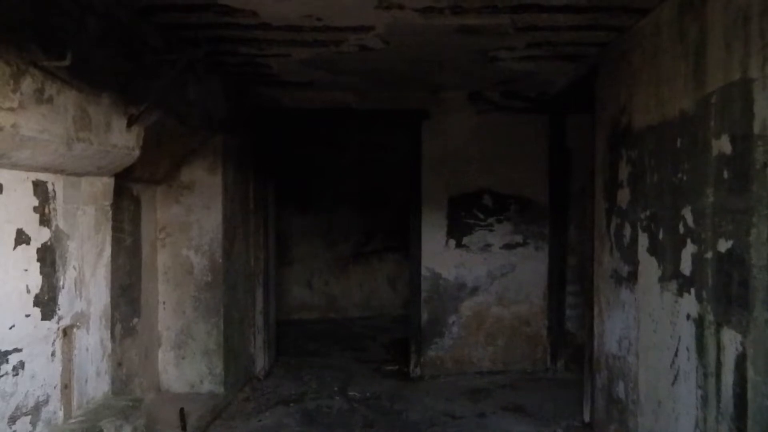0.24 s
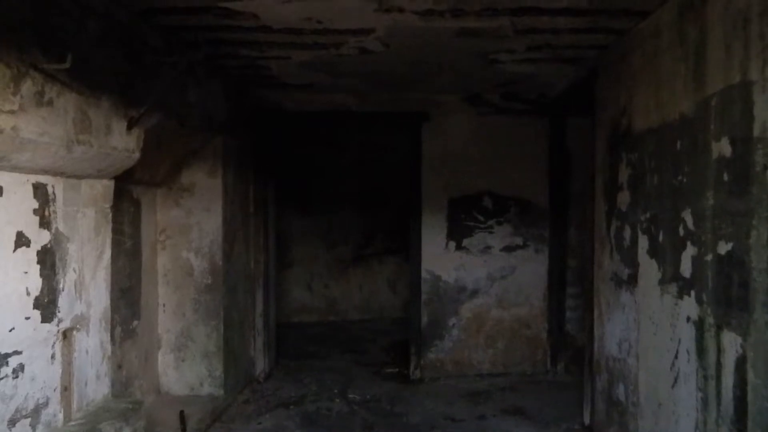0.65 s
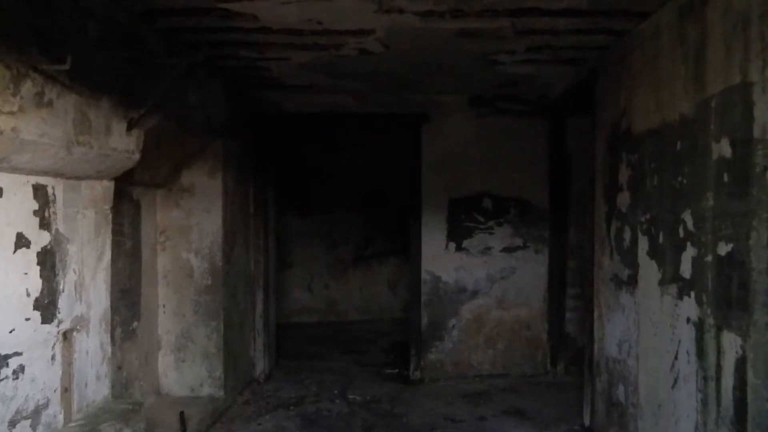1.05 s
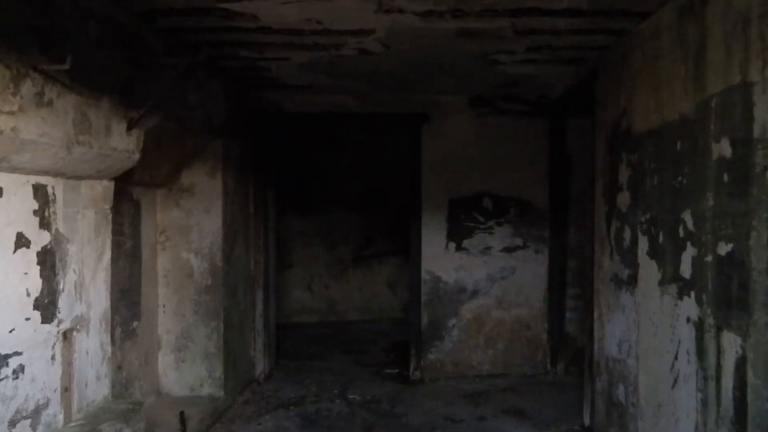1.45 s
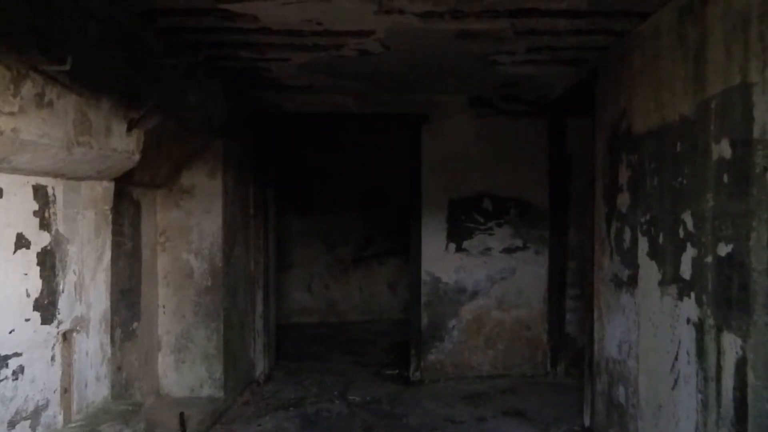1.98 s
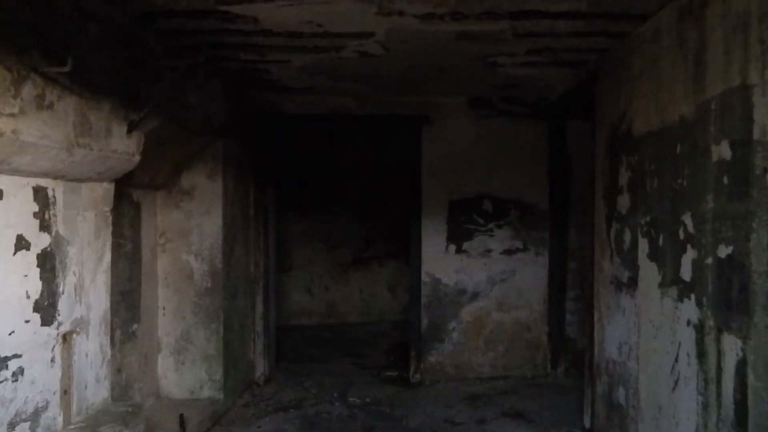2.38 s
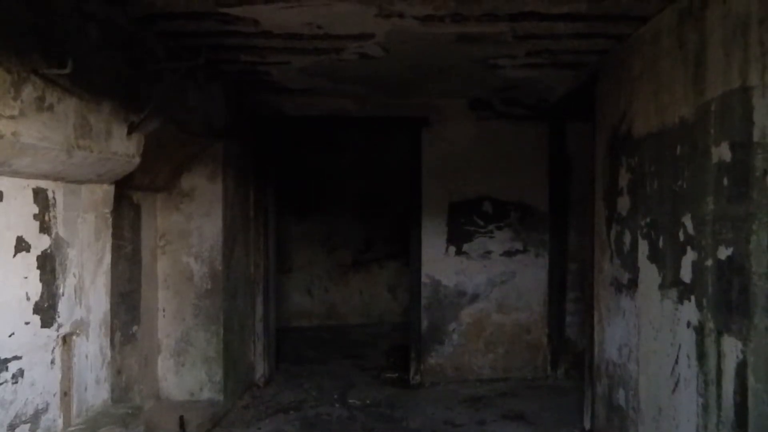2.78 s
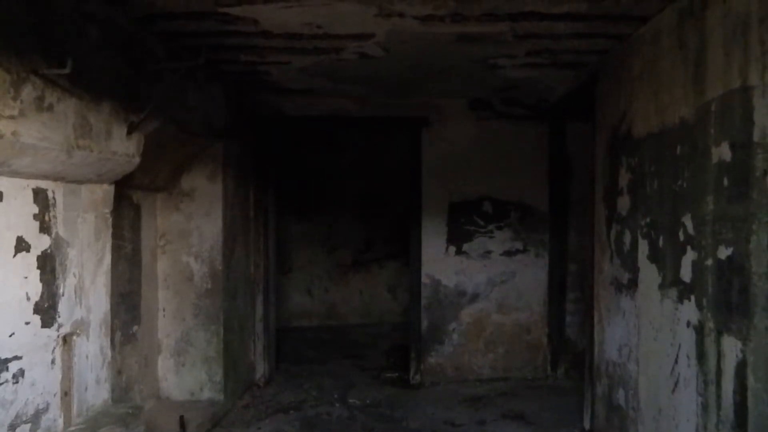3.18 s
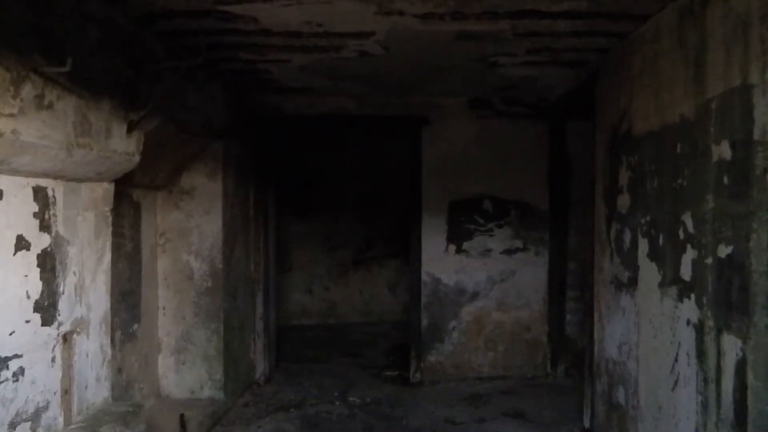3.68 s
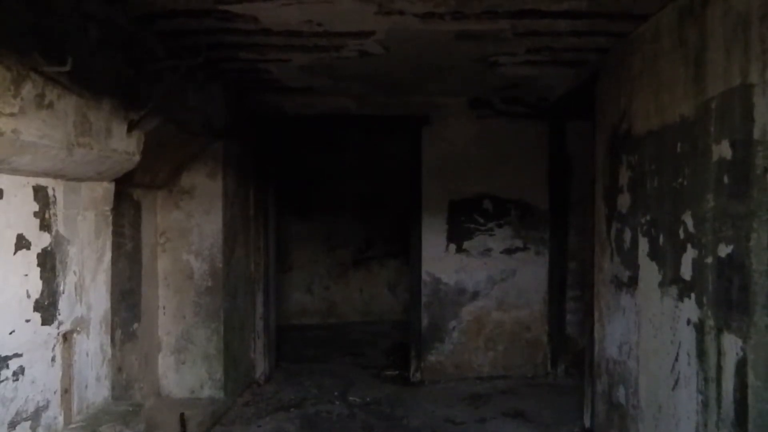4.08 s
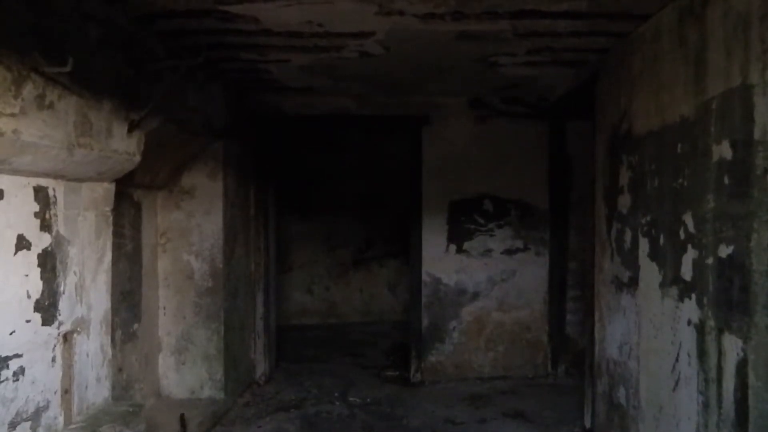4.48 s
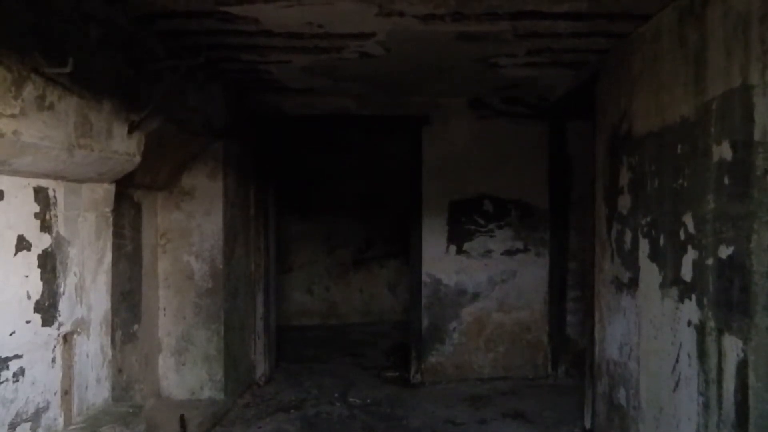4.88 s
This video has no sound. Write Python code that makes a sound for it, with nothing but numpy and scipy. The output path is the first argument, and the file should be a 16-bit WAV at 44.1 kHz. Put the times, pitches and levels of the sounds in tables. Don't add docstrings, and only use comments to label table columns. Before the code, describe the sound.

Unseen swallows chatter in a bare, decaying concrete room. The tail of an earlier call rings at the start, with a faint rasp near 0.15 s. From 0.55 to 0.8 s quick scratchy chirps cluster, then a clear, bright pair arrives at about 0.95 and 1.05 s, the second lower. A string of hoarse, quieter chirps runs from 1.1 to 1.8 s. A higher, strained pair follows at 2.0 to 2.1 s, and a loud pair mixed with raspy begging notes at 2.4 to 2.6 s. Calls thin out around 2.9, 3.2 and 3.5 s, including deeper rough notes. Chirps gather again at 3.9 to 4.25 s, and strong harsh ones come at 4.6 to 5.0 s. Each call dips, then swoops up, leaving a ringing wall echo of about half a second. Underneath, a distant machine hums low and slightly wavering, with soft rumble and faint hiss.

```python
import sys
import numpy as np
from scipy import signal
from scipy.fft import rfft, irfft
from scipy.io import wavfile
from scipy.ndimage import uniform_filter1d

SR = 44100
rng = np.random.default_rng(int(sys.argv[2]) if len(sys.argv) > 2 else 0)


def level_to_linear(level):
    exponent = np.asarray(level, float) / 20
    return 10 ** exponent


def dump(signal):
    limited = np.clip(np.atleast_2d(signal).T, -1, 1)
    pcm = np.round(limited * 32767).astype(np.int16)
    wavfile.write(sys.argv[1], SR, pcm)


N = 226612
FRAME = 6144
TOP_HZ = 15780

PARTIALS = [(1, 0), (0, 1), (1, -1), (-1, 2), (2, -1), (3, -2), (1, 1), (0, 2), (2, 0), (3, -1), (1, 2),
            (2, 1), (3, 0)]


def low_bird():
    notes_sung = [(.605, 4594, -22, -7.5), (1.692, 4587, -22, -4.2), (1.77, 4235, -24.5, 0.3),
                  (2.838, 4670, -18.5, -4.4), (3.534, 4605, -19.5, -4), (4.173, 4923, -15, -2.5),
                  (4.256, 4390, -18, -5.5), (4.68, 4413, -20.5, -4), (4.959, 4780, -16, -2.5)]
    return bird(sung(notes_sung, dip=.795, gap=.333), length_s=.045, echo_db=-3,
                wait=0.4273, locked=1, lead=0.59, throat_size=0.9555, side_db=-6.5, sum_db=5.5,
                rough=0.56, onset_rough=0.17, dip_db=-4.5, lower_db=0.8)


def deep_notes():
    notes_sung = [
        (2.182, 3370, -38, -4),
        (2.91, 3753, -25.5, 7.5),
        (3.898, 3453, -31.5, 9),
        (5.062, 3623, -26, 8.5),
    ]
    return bird(sung(notes_sung, dip=.878, gap=.334), length_s=.048, echo_db=-3,
                wait=.4, locked=.99, lead=0.2, throat_size=1.266, side_db=0.73, sum_db=6.5,
                rough=0.76, onset_rough=-0.5, dip_db=-9, lower_db=5)


def high_bird():
    chirps = [
        (.957, 5636, -18.5, 4246, 1436),
        (1.048, 5085, -16.5, 4037, 1360),
        (2.02, 6450, -23.5, 4767, 1695),
        (2.122, 5907, -19.5, 4442, 1697),
        (2.482, 5740, -16.5, 4384, 1651),
        (2.575, 5167, -14.5, 4250, 1553),
    ]
    calls = []
    for end_s, top_hz, level_db, dip_hz, gap_hz in chirps:
        strain_khz = max(top_hz - 5800, 0) / 1000
        tilt_db = 1.24 + 10 * strain_khz
        calls.append((end_s, dip_hz, top_hz, gap_hz, level_db, tilt_db))
    return bird(calls, length_s=.066, echo_db=-3, stretch=0.97,
                wait=.52, locked=0.18, lead=0.15, throat_size=1.0222, side_db=-2, sum_db=3.5,
                rough=.25, onset_rough=.15, flutter_hz=230, flutter=.3, dip_db=-8, lower_db=6)


def hoarse_bird():
    notes_sung = [(.694, 5270, -25.5, -1), (.795, 5225, -26, -0.5), (1.112, 5340, -24, -3.5),
                  (1.206, 5086, -24, -0.5), (1.303, 5335, -23.5, 1.5), (1.418, 5516, -25.5, -1),
                  (1.56, 5670, -25.5, 3), (1.668, 5600, -25, 0), (1.765, 5220, -25, 1.5),
                  (3.178, 5054, -23, -2.5), (3.284, 4800, -27.5, -5.5), (4.021, 5050, -25.5, -3),
                  (4.113, 4710, -26, -5)]
    return bird(sung(notes_sung, dip=.715, gap=.247), length_s=.052, echo_db=-3,
                wait=.55, locked=0.05, lead=0.45, throat_size=0.9523, side_db=1, sum_db=9,
                rough=.32, onset_rough=1.9, flutter_hz=239.5, flutter=.05, dip_db=-6.5, lower_db=-1)


def young_bird():
    notes_sung = [(-.08, 4970, -31, -6.5), (.155, 5080, -40, 18.5), (.56, 5200, -37, 10),
                  (.6, 5550, -21, 1.5), (.635, 5360, -31.5, 11.5), (1.29, 5480, -30, 13),
                  (2.405, 5300, -49, 0.1), (2.436, 5220, -21.5, 4), (2.522, 5000, -19.5, 2.5),
                  (2.602, 5350, -27.5, 1), (4.585, 4963, -14, 2.5), (4.66, 4814, -18.5, -0.5),
                  (4.70, 4700, -20, -1.5)]
    return bird(sung(notes_sung, dip=.85, gap=.295), length_s=.06, echo_db=-3,
                wait=.45, locked=.3, lead=0.37, throat_size=0.98, side_db=-0.19, sum_db=.1,
                rough=1, onset_rough=0, dip_db=-10, lower_db=3.5)


def sung(notes_sung, dip, gap):
    return [(end_s, dip * top_hz, top_hz, gap * top_hz, level_db, tilt_db)
            for end_s, top_hz, level_db, tilt_db in notes_sung]


def bird(calls, length_s, echo_db, stretch=0, **voice):
    lead_in = round(.3 * SR)
    direct = np.zeros(N + 2 * lead_in)
    for end_s, dip_hz, top_hz, gap_hz, level_db, tilt_db in calls:
        call_s = length_s * ((top_hz - dip_hz) / 1300) ** stretch
        stop = lead_in + round((end_s + .15 * call_s) * SR)
        call = chirp(dip_hz, top_hz, gap_hz, tilt_db, call_s, **voice)
        direct[stop - FRAME:stop] += level_to_linear(level_db) * call
    echoes = signal.fftconvolve(direct, room())[:len(direct)]
    return (direct + level_to_linear(echo_db) * echoes)[lead_in:lead_in + N]


def chirp(dip_hz, top_hz, gap_hz, tilt_db, length_s, wait, locked, lead, throat_size, side_db, sum_db,
          rough, onset_rough, dip_db, lower_db, flutter_hz=230, flutter=0):
    u = 1.15 - np.arange(FRAME)[::-1] / (length_s * SR)
    pitch = pitches(u, dip_hz, top_hz, gap_hz, wait, locked)
    gains = level_to_linear(partial_levels(u, wait, locked, lower_db, side_db, sum_db) + tilt_db * np.log2(pitch / 5000))
    gains = gains * (pitch < TOP_HZ)
    start_phase = rng.uniform(0, 2 * np.pi, (len(PARTIALS), 1))
    partials = gains * np.sin(np.cumsum(2 * np.pi * pitch / SR, axis=1) + start_phase)

    scatter = np.array([wander(427, FRAME) for _ in PARTIALS])
    settling = onset_rough * np.clip(1.6 - 1.46 * u / wait, 0, 1)
    treble_rough = .22 * np.log2(np.maximum(pitch / 5000, 1))
    share = np.clip(rough + settling + treble_rough, 0, 1)
    sound = (partials * (np.sqrt(1 - share ** 2) + share * scatter)).sum(axis=0)

    beat = 1 + flutter * np.sin(2 * np.pi * (flutter_hz * length_s * u + rng.random()))
    swell_db = np.interp(u, [-1.2, -lead, .12, .5, .85, .97, 1.13],
                         [-120, dip_db - 39.5, dip_db - 5.0, dip_db, 0.1, -2.1, -40])
    call = throat(sound * beat * level_to_linear(swell_db), throat_size)
    return call / np.sqrt(uniform_filter1d(call ** 2, size=400).max())


def partial_levels(u, wait, locked, lower_db, side_db, sum_db):
    strengths = [3.5, -1.35, -3.5, -14.5, -2, -2, -4, -6.5, -2.5, -10.5, -8, -11, -8.5]
    levels = np.zeros((len(PARTIALS), FRAME))
    for row, (level_db, (upper, lower)) in enumerate(zip(strengths, PARTIALS)):
        levels[row] = level_db
        if (upper, lower) == (0, 1):
            levels[row] += lower_db
        if (upper, lower) == (2, -1):
            levels[row] += side_db
        if (upper, lower) == (1, 1):
            levels[row] += sum_db
    climb = swoop(u, wait, 0)
    levels[0] += (1 - locked) * -3.5 * (1 - climb)
    levels[1] += (1 - locked) * -8 * climb
    return levels


def pitches(u, dip_hz, top_hz, gap_hz, wait, locked):
    together = swoop(u, wait, .45 + locked * (.25 - .45))
    alone = swoop(u, wait - .16, .15)
    guide_shape = alone + locked * (together - alone)
    jitter = 1 + 0.0057 * wander(320, FRAME)
    upper = (dip_hz + (top_hz - dip_hz) * together) * jitter
    guide = (dip_hz + (top_hz - dip_hz) * guide_shape) * jitter
    lower = guide - gap_hz * (guide / top_hz) ** locked
    return np.maximum(np.array(PARTIALS) @ np.array([upper, lower]), 500)


def swoop(u, wait, fall):
    climb = np.clip((u - wait) / (.9 - wait), 0, 1)
    falling = fall * np.minimum(1 - u / wait, 1.2) ** 2
    return np.where(u < wait, falling, climb ** 2 * (3 - 2 * climb))


def throat(sound, throat_size):
    response = [(900, -49.5), (1600, -24.5), (1900, -25.5), (2300, -20.5), (2650, -5), (3800, -4),
                (5200, 0), (6300, -8), (8000, -16), (11000, -19.5), (15500, -27)]
    hz = np.maximum(np.arange(FRAME // 2 + 1) * SR / FRAME * throat_size, 20)
    return irfft(rfft(sound) * level_to_linear(at_hz(response, hz)))


def room():
    decay = [(1200, 1), (2500, 0.6), (4000, 0.55), (6000, 0.59), (9000, 0.19), (14000, 0.55)]
    s = np.arange(SR) / SR
    edges = 1000 * 2 ** np.arange(0, 4.1, .5)
    tail = np.zeros(SR)
    for low, high in zip(edges, edges[1:]):
        band_pass = signal.butter(2, [low, high], "band", fs=SR, output="sos")
        band = signal.sosfilt(band_pass, rng.standard_normal(SR))
        tail += band * level_to_linear(-60 * s / at_hz(decay, np.sqrt(low * high)))
    build_up = np.clip((s - .003) / 0.0016, 0, 1)
    early_boost = 1 + 1.6 * np.exp(-s / 0.046)
    tail = tail * build_up * early_boost
    return tail / np.sqrt(np.sum(tail ** 2))


def hum():
    orders = [
        (68.8, -57.5, 1),
        (99, -63, -5),
        (136.7, -47.5, 2.5),
        (164.4, -64, 4.5),
        (199.3, -67, 2),
    ]
    out = np.zeros(N)
    for pitch_hz, level_db, wobble_db in orders:
        phase = np.cumsum(2 * np.pi * pitch_hz * (1 + 0.00342 * wander(2.4, N)) / SR)
        out += np.sqrt(2) * level_to_linear(level_db + wobble_db * wander(12.5, N)) * np.sin(phase)
    return out


def air():
    colour = [(20, -7.5), (60, -11), (110, -12), (190, -16), (380, -20.5), (630, -25), (1000, -26.5),
              (2000, -30.5), (4000, -33), (7000, -33), (12000, -37), (15700, -40.5)]
    hz = np.maximum(np.arange(N // 2 + 1) * SR / N, 20)
    spectrum = rfft(rng.standard_normal(N)) * level_to_linear(at_hz(colour, hz))
    rms_above_rumble = np.sqrt(2 * np.sum(np.abs(spectrum[hz > 200]) ** 2)) / N
    return level_to_linear(-53) * irfft(spectrum, N) / rms_above_rumble


def wander(rate_hz, count):
    r = np.exp(-2 * np.pi * rate_hz / SR)
    run_in = count // 8
    noise = rng.standard_normal(count + run_in)
    slow = signal.lfilter([1], [1, -2 * r, r * r], noise)[run_in:]
    return slow / np.sqrt(np.mean(slow ** 2) + 1e-20)


def at_hz(points, hz):
    table_hz, values = np.array(points).T
    return np.interp(np.log(hz), np.log(table_hz), values)


def scene():
    flock = low_bird() + deep_notes() + high_bird() + hoarse_bird() + young_bird()
    return (flock + hum() + air())[None]


def roll_off(x):
    return signal.sosfilt(signal.butter(12, 15750, fs=SR, output="sos"), x)


def record(dry):
    hz = np.arange(N // 2 + 1) * SR / N
    mix = irfft(rfft(dry) * (hz < TOP_HZ), N)
    return roll_off(mix)


dry = scene()
out = record(dry)
dump(out)
```